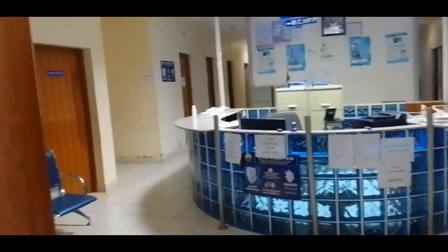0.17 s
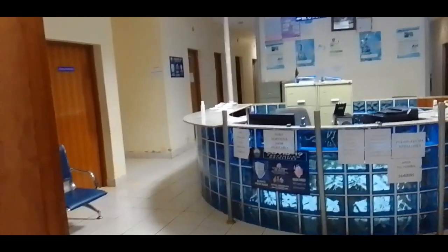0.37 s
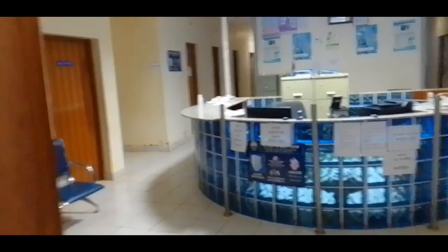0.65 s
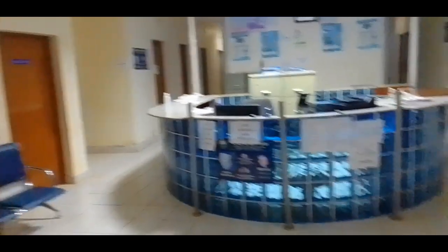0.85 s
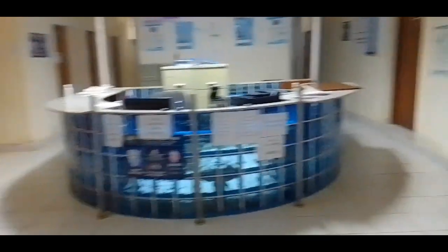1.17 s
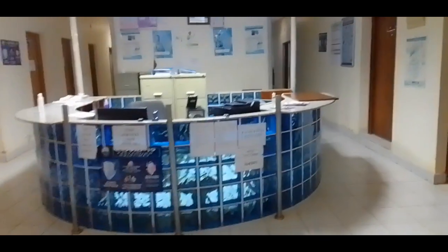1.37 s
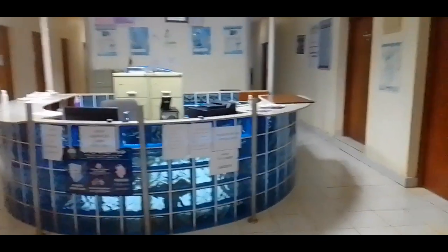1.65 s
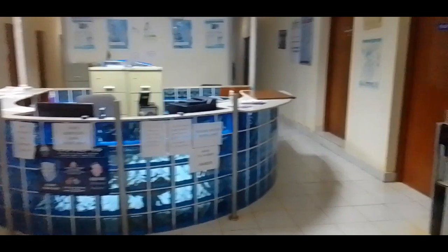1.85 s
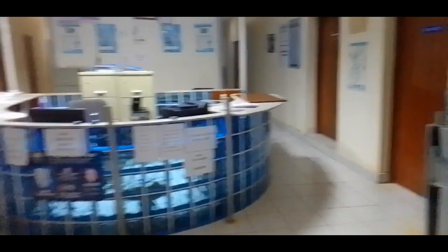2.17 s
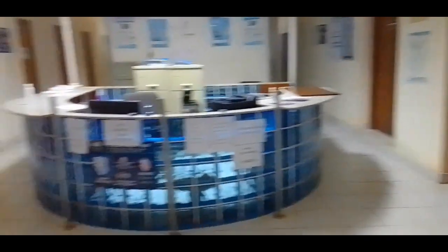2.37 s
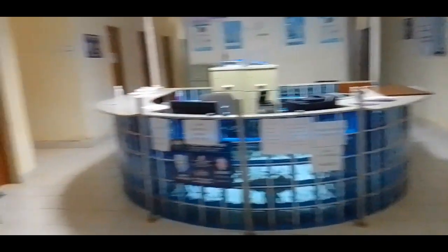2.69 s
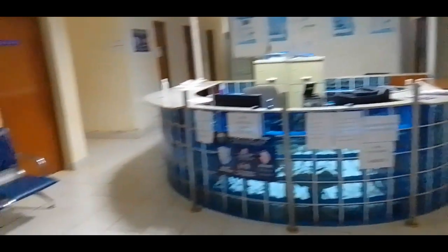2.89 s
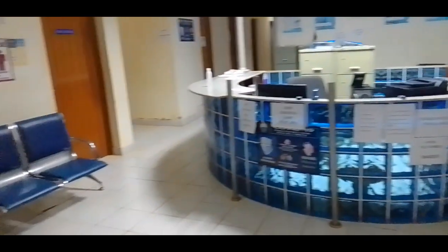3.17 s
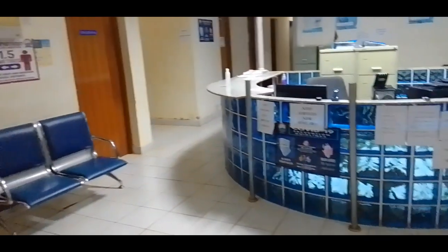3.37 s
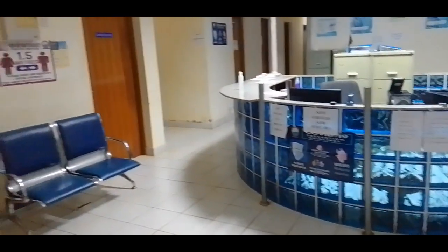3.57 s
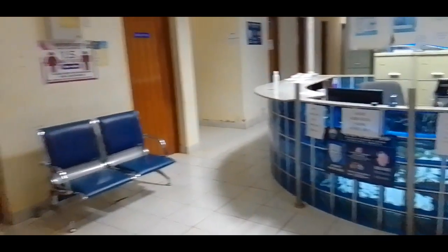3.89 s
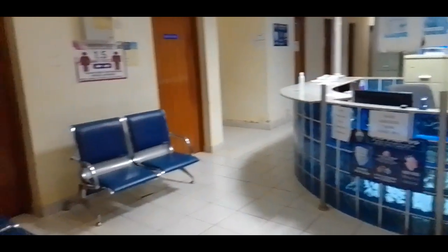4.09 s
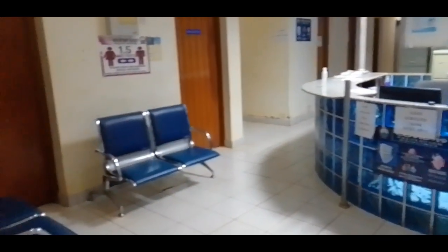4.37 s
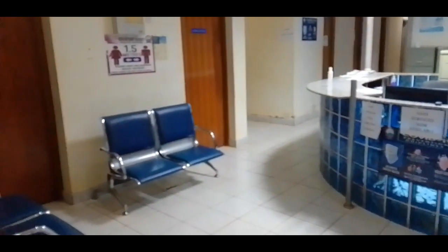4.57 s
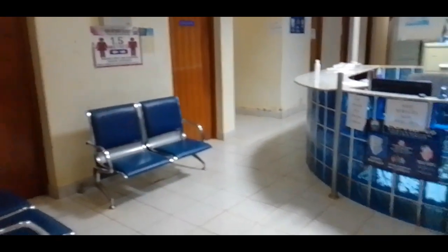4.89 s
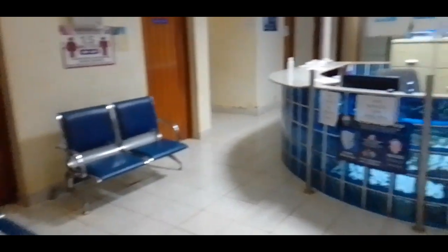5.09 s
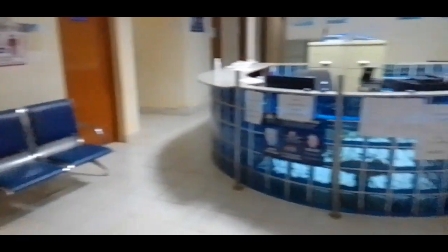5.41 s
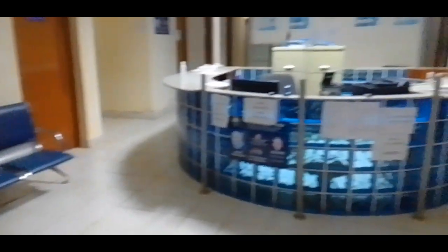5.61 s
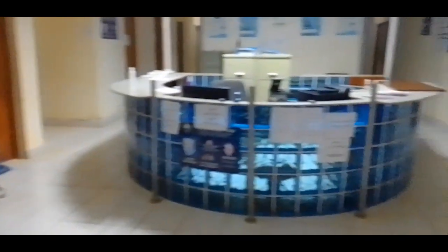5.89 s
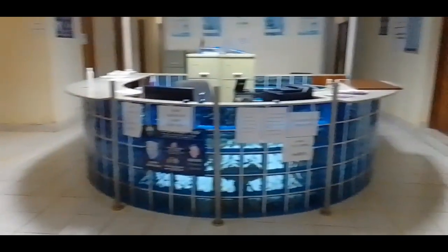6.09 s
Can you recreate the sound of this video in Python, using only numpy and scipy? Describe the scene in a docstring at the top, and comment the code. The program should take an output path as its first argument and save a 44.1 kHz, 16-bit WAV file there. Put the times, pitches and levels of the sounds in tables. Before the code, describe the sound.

In an echoing empty tiled hall, crickets trill steadily, brief husky bird whistles come and go, with close light taps over faint traffic.

```python
"""An empty tiled reception hall, open to a garden, heard through one mono microphone that cuts the deep bass.
An insect chorus of pulsed tones and a smoother trill lies near 6 kHz, with a fainter noise band near 4 kHz.
Gliding husky whistles make a bird; ringing modes make light clicks close by, and both echo in the hall.
Close in, shaped noise rustles and damped swings thud softly. Far off, multiples of a firing rate make
a small engine that climbs through a gear change, over traffic rumble, patchy midrange noise and hiss."""
import sys
import numpy as np
from scipy import signal
from scipy.fft import rfft, irfft
from scipy.io import wavfile

SR = 44100
rng = np.random.default_rng(int(sys.argv[2]) if len(sys.argv) > 2 else 0)


def dump(signal):
    """Clip the signal to [-1, 1] and save it as 16-bit WAV at the path in sys.argv[1]."""
    limited = np.clip(np.atleast_2d(signal).T, -1, 1)
    pcm = np.round(limited * 32767).astype(np.int16)
    wavfile.write(sys.argv[1], SR, pcm)


def boost(x):
    """Linear amplitude factor 10**(x/20) for a level x in decibels (scalar or array-like)."""
    u = np.asarray(x, float) / 20
    return 10 ** u


N = 275625      # samples: 6.25 s

# phrases of the pulsing singers: (start [s], length [s], level [dB], pitch [Hz])
SINGER_PHRASES = [(-.3, 0.34, -36, 5520), (0.123, 0.37, -45.5, 5616), (0.538, 0.36, -45, 5585),
                  (0.985, 0.5, -49, 5625), (1.465, .38, -48.5, 5420), (1.949, 0.34, -48.5, 5440),
                  (2.387, 0.36, -50, 5433), (2.87, 0.32, -45.5, 5550), (3.265, .36, -47.5, 5500),
                  (3.677, .31, -50.5, 5443), (4.138, 0.323, -47, 5455), (4.581, 0.34, -47.5, 5410),
                  (4.996, 0.3, -49.5, 5390), (5.493, 0.33, -46.5, 5546), (5.952, 0.31, -47, 5430)]
# smooth upper trill: (time [s], level [dB], centre [Hz])
TRILL_CURVE = [(0.0, -47.5, 6030), (0.35, -46, 5980), (0.36, -49.5, 5930), (0.71, -47.5, 5940),
               (0.92, -52.5, 5930), (1.08, -43.5, 6086), (1.27, -48, 5890), (1.36, -56, 5800),
               (1.58, -46.5, 5950), (1.79, -54.5, 5960), (2.12, -46, 6020), (2.31, -51.5, 5910),
               (2.71, -48.5, 5983), (2.99, -53.5, 5964), (3.06, -49.5, 5910), (3.31, -47.5, 6005),
               (3.48, -55, 5880), (3.79, -47, 6114), (3.95, -52.5, 5832), (4.04, -49.5, 5990),
               (4.28, -51, 5876), (4.54, -47, 6100), (4.68, -52.5, 5900), (5.05, -47.5, 6033),
               (5.21, -53, 5870), (5.36, -47.5, 6160), (5.59, -52.5, 5890), (6.08, -50, 6000),
               (6.13, -58, 5860), (6.25, -48, 5960)]
# bird notes: (start [s], length [s], first pitch [Hz], last pitch [Hz], level [dB])
BIRD_NOTES = [(0, 0.05, 3333, 2697, -43.5), (0.963, 0.043, 2650, 2870, -68),
              (0.994, 0.15, 2933, 3035, -54.5), (1.03, 0.06, 3595, 3050, -44.5),
              (1.505, 0.052, 2678, 2680, -61.5), (2.211, 0.071, 2643, 2766, -58.5),
              (2.269, 0.035, 3240, 3010, -52.5), (2.283, 0.066, 2750, 2900, -54),
              (2.46, 0.022, 2555, 2990, -50), (2.483, 0.053, 3257, 2950, -44.5),
              (2.513, 0.041, 3600, 3255, -47), (2.698, 0.11, 2710, 2820, -48),
              (2.755, .05, 3450, 2976, -44), (2.819, 0.063, 2990, 2807, -50),
              (3.039, 0.11, 3019, 3085, -49), (3.101, 0.11, 2746, 2816, -46.5),
              (3.105, 0.027, 3660, 3260, -41.5), (3.151, 0.07, 3390, 2948, -48),
              (3.485, 0.18, 2659, 2644, -60.5), (3.678, 0.22, 2630, 2457, -60.5),
              (3.837, 0.064, 1153, 1653, -80), (3.94, 0.071, 1154, 1565, -62),
              (4.024, 0.077, 2760, 2784, -49.5), (4.079, 0.054, 3470, 3133, -48.5),
              (4.107, 0.057, 2790, 2906, -47.5), (4.136, 0.026, 3275, 2946, -46),
              (4.192, 0.087, 2280, 2380, -59.5), (4.298, 0.061, 2425, 2339, -59),
              (4.402, 0.075, 2767, 2807, -46), (4.454, 0.074, 3450, 2880, -53),
              (4.845, 0.095, 2730, 2848, -64), (4.899, 0.07, 3416, 3132, -60.5),
              (4.968, 0.13, 2198, 2322, -69), (5.07, 0.088, 2814, 2887, -48),
              (5.113, 0.037, 3320, 3030, -54.5), (5.414, 0.021, 2654, 2900, -53),
              (5.444, 0.022, 2750, 2716, -54), (5.536, 0.068, 2636, 2809, -47.5),
              (5.559, 0.064, 3940, 3347, -52), (5.574, 0.068, 3347, 2810, -49),
              (6.166, 0.062, 2184, 2400, -72)]
# taps on a small hard object: (time [s], level [dB], dullness [0-1])
TAPS = [(1.3009, -45.5, 0.76), (1.5859, -53, 0.49), (1.6551, -48.5, 0.36), (1.9515, -43, 0.31),
        (1.9993, -45, 0.24), (2.1246, -54, 0.02), (2.1844, -63, 0.23), (2.9966, -71, 0.36),
        (5.5228, -42.5, 0)]
# ringing modes of that object: (frequency [Hz], relative level [dB], decay by 60 dB [s])
TAP_MODES = [(2103, -21.5, 0.011), (2750, -18, 0.022), (3600, -28, 0.096), (8320, 0, 0.019),
             (9240, -2, 0.019), (10800, -4, .012), (13700, -16, 0.0067)]
# bursts of rustle: (peak time [s], peak level [dB], rise [dB/s])
RUSTLE_BURSTS = [(1.1, -70, 300), (1.32, -55.5, 900), (1.43, -53.5, 150), (1.56, -63.5, 150),
                 (1.65, -73, 500), (1.95, -53, 2000), (2.02, -58, 300), (3.1, -68, 81), (5.46, -66, 100),
                 (5.53, -55.5, 400), (5.62, -63.5, 200)]
# colour of the rustle: (frequency [Hz], relative level [dB per Hz])
RUSTLE_COLOUR = [(6500, 2), (7300, 2), (8200, 0.5), (9200, 0), (10600, -7), (12000, -14), (14000, -23)]
# soft thuds on the microphone's case: (time [s], peak level [dB])
CASE_THUDS = [(3.758, -45), (3.902, -49.5), (4.081, -55), (4.27, -52.5), (5.868, -44.5), (5.968, -49.5)]
# faint distant chorus: (time [s], level [dB])
LOW_CHORUS_LEVEL = [(0.0, -64), (0.45, -65.5), (1.1, -63), (1.64, -66.5), (2.7, -64.5), (3.8, -67),
                    (4.1, -65), (5.8, -66), (6.25, -65)]
# far engine: (time [s], firing rate [Hz], level [dB])
ENGINE_RUN = [(0.0, 59.63, -63), (0.29, 58.7, -63), (0.95, 65, -56.5), (1.15, 69.25, -57),
              (1.37, 71.16, -60.5), (1.55, 74.95, -55.5), (2.0, 77.37, -54.5), (2.2, 76.55, -67.5),
              (2.52, 73, -62), (2.751, 61.9, -63.5), (3.1, 62.95, -59), (3.5, 63.57, -64),
              (4.0, 63.02, -63.5), (4.37, 62.74, -65.5), (4.45, 61.5, -81)]
# engine harmonics: (multiple of the firing rate, relative level [dB])
FIRING_MULTIPLES = [(2, -3.5), (3, -8), (4, 0), (5, 0.5), (6, -0.5), (7, -5), (8, -6.5), (9, -19),
                    (10, -12.5)]
# resonances of exhaust and path: (centre [Hz], width [Hz], lift [dB])
ENGINE_RESONANCES = [(137.08, 18, 8.5), (228.3, 63, 18.5), (365, 36, 7.5), (485, 190, 10)]
# midrange swells: (peak time [s], upper patch level [dB], middle patch level [dB], middle patch centre [Hz])
MIDRANGE_SWELLS = [(0.02, -63.5, -75.5, 1687), (.3, -75, -81, 1450), (1.04, -57.5, -74, 1550),
                   (1.2, -61, -68.5, 1510), (1.3, -61.5, -68, 1489), (1.43, -64.5, -67.5, 1381),
                   (1.699, -75, -74.5, 1399), (1.96, -65, -85, 1620), (2.27, -71, -79, 1600),
                   (2.4, -70, -93, 1570), (2.521, -66, -69.5, 1484), (2.77, -57.5, -67, 1508),
                   (3.159, -54, -65.5, 1645), (3.27, -74, -74, 1560), (3.451, -85, -93, 1606),
                   (3.9, -88, -74, 1492), (4.02, -68, -61, 1345), (4.121, -64, -70, 1500),
                   (4.49, -59, -75, 1680), (4.961, -61.5, -80, 1698), (5.08, -70, -87, 1593),
                   (5.17, -65.5, -72.5, 1537), (5.47, -63.5, -77, 1660), (5.61, -56.5, -71, 1672),
                   (5.85, -67.5, -75, 1615), (6.13, -64, -94, 1614), (6.22, -65, -92, 1400)]
# midrange patch near 900 Hz: (time [s], level [dB])
LOW_PATCH_LEVEL = [(0.0, -80.5), (0.29, -70.5), (0.56, -83), (1.02, -78), (1.04, -68), (1.32, -67),
                   (1.55, -69), (1.67, -61), (1.71, -66.5), (2.33, -74), (2.47, -68), (3.55, -72),
                   (3.81, -110), (4.0, -72), (5.59, -85.5), (5.66, -73.5), (5.92, -71.5), (6.25, -87)]
# traffic rumble: (time [s], level [dB])
TRAFFIC_LEVEL = [(0.0, -59), (0.31, -61), (0.42, -59), (1.67, -59), (2.16, -60), (2.77, -58), (3.5, -61),
                 (3.86, -61), (4.51, -62), (5.08, -61.5), (6.25, -64)]
# colour of the traffic: (frequency [Hz], relative level [dB per Hz])
TRAFFIC_COLOUR = [(35, -59), (60, -45), (121, -8), (231, 0), (317, -3.5), (389, -2.5), (461, -8.5),
                  (522, -5.5), (670, -17), (900, -26), (1170, -71), (1980, -120)]
# colour of the steady hiss: (frequency [Hz], relative level [dB per Hz])
HISS_COLOUR = [(500, -6), (900, 6), (3500, 2), (4250, -26), (4600, -18), (7000, 6), (10000, -14),
               (16000, -8)]
# hiss in the top treble: (time [s], level [dB])
TOP_HISS_LEVEL = [(0.0, -84), (0.23, -76), (0.75, -91), (1.09, -82), (1.5, -83), (1.74, -93), (3.2, -72.5),
                  (3.67, -86), (4.11, -77), (4.28, -74.5), (4.94, -70.5), (5.22, -74.5), (5.85, -75),
                  (6.25, -77.5)]
# colour of the top hiss: (frequency [Hz], relative level [dB per Hz])
TOP_HISS_COLOUR = [(8500, -39), (10300, -1.5), (12000, -2.5), (13000, -7.5), (14500, -3.5), (16000, -13)]


def high_chorus():
    """Near singers stroke their wings some 45 times a second, each stroke a raspy falling tone, under a trill."""
    return pulsing_singers() + smooth_trill()


def stroke_phase(rate_spread):
    """Wing-stroke cycles since the start, at a rate that wanders around 44.5 per second."""
    return np.cumsum(44.5 * (1 + rate_spread)) / SR


def pulsing_singers(count=3):
    """Each stroke sounds a falling tone for part of its cycle; uneven tooth strikes roughen it."""
    stroke_share, sweep_hz, near_singer_db, blur_db = 0.7, 708, 4.5, -1.0
    phrase_hz = in_time([(s + length / 2, hz) for s, length, db, hz in SINGER_PHRASES])[0]
    near = 0
    for k in range(count):
        stroke = (rng.random() + stroke_phase(0.013 * rng.normal() + 0.035 * drift(3.0))) % 1
        along = np.clip(stroke / stroke_share, 0, 1)
        pitch = phrase_hz + 60 * drift(1.5) + sweep_hz * (0.5 - along)
        tone = rasp(width_hz=120, share=0.55) * turning(pitch)
        singer_db = near_singer_db * (k == 0) + 1.8 * drift(0.92)
        near = near + rms_one(np.sin(np.pi * along) * tone.real) * boost(singer_db)
    blur = rms_one(band(rng.standard_normal(N), 5050, 6200))      # far singers and echoes fill the gaps
    pulsing = band(rms_one(near) + boost(blur_db) * blur, 5150, 6150)
    pulsing = rms_one(band(pulsing, 4850, 6700, order=5))
    overtone = boost(-41) * rms_one(band(pulsing ** 2, 8300, 14000))      # the wings also ring an octave up
    return boost(phrase_level_db()) * (pulsing + overtone)


def phrase_level_db():
    """Level in dB of the pulsing singers: each phrase swells, holds and breaks off."""
    rise_s, fall_s, between_db = 0.067, 0.073, -52
    t, level_db = np.arange(N) / SR, np.full(N, float(between_db))
    for s, length, db, hz in SINGER_PHRASES:
        singing = np.clip(np.minimum((t - s) / rise_s, (s + length - t) / fall_s), 0, 1)
        level_db = np.maximum(level_db, between_db + singing * (db - between_db))
    return level_db


def smooth_trill():
    """A wide, noisy tone throbs gently at about the stroke rate."""
    level_db, centre_hz = in_time(TRILL_CURVE)
    throb = 1 + 0.13 * np.sin(2 * np.pi * stroke_phase(0.07 * drift(3.0)))
    trill = throb * np.real(rasp(width_hz=580, share=0.96) * turning(centre_hz))
    trill = band(band(trill, 5400, 6400), 4900, 7250, order=5)
    return boost(level_db) * rms_one(trill)


def bird():
    """Short gliding, husky whistles with a faint tone an octave below."""
    scoop_hz, scoop_s, attack_s, undertone_db = 364, 0.009, 0.007, -21
    out, husk = np.zeros(N), rasp(width_hz=95, share=0.44)
    for s, length, first_hz, last_hz, level_db in BIRD_NOTES:
        start = round(s * SR)
        along = np.linspace(0, 1, round(length * SR))
        pitch = first_hz + (last_hz - first_hz) * along
        if last_hz > first_hz:      # rising notes start from below
            pitch = pitch - scoop_hz * np.exp(-along * length / scoop_s)
        octave_below = turning(pitch / 2)
        attack = np.minimum(along * length / attack_s, 1)
        shape = attack * np.sqrt(np.abs(np.cos(np.pi / 2 * along)))
        tone = (octave_below ** 2 + boost(undertone_db) * octave_below) * husk[start:start + len(along)]
        out[start:start + len(along)] += boost(level_db) * shape * tone.real
    return out


def clicks():
    """A small hard object is tapped close by: every mode rings briefly, dull taps lose their top."""
    times, tap_db, dull = np.transpose(TAPS)
    at = np.round(times * SR).astype(int)
    scatter_db = rng.normal(0, 0.71, (len(at), len(TAP_MODES)))
    out = np.zeros(N)
    for k, (hz, mode_db, t60) in enumerate(TAP_MODES):
        tilt_db = -19.1 * dull * np.log2(hz / 8000)
        blows = np.full(N, 1e-18)
        blows[at] = boost(tap_db + mode_db - 1 + scatter_db[:, k] + tilt_db)
        r, w = boost(-60 / (t60 * SR)), 2 * np.pi * hz / SR      # decay and turn per sample
        out += signal.lfilter([0, np.sin(w)], [1, -2 * r * np.cos(w), r * r], blows)
    crack = np.zeros(N)      # the contact itself: one sharp broad tick
    crack[at] = boost(tap_db + 12.02)
    return out + band(crack, 1900, 13000)


def rustle(level_db):
    """Treble noise in irregular bursts, close to the microphone."""
    return boost(level_db) * coloured(RUSTLE_COLOUR, patchy_db=2.5)


def thuds():
    """Fingers shift on the microphone's case: one soft, damped low swing each."""
    swing_hz, damping_s, lag_s = 240, 0.0022, 0.005
    out, t = np.zeros(N), np.arange(2000) / SR
    swing = np.sin(2 * np.pi * swing_hz * t) * t * np.exp(-t / damping_s)
    for s, peak_db in CASE_THUDS:
        start = round((s + lag_s) * SR)      # the case takes a moment to swing
        out[start:start + len(t)] += boost(peak_db) * swing / swing.max()
    return out


def hall(x):
    """Dense echoes off tile and plaster: dulled dying noise, plus full-band noise dying twice as fast."""
    t60_s, wall_cut_hz, first_echoes_s = 0.67, 3700, 0.008
    t = np.arange(SR) / SR
    low_pass = signal.butter(1, wall_cut_hz, fs=SR, output="sos")
    dull = signal.sosfilt(low_pass, rng.standard_normal(SR))
    tail = dull * boost(-60 * t / t60_s) + rng.standard_normal(SR) * boost(-120 * t / t60_s)
    tail = tail * np.minimum(t / first_echoes_s, 1)      # the first echoes need time to arrive
    return signal.fftconvolve(x, tail / np.sqrt(np.sum(tail ** 2)))[:N]


def low_chorus():
    """Distant crickets merge into a softly throbbing band of noise."""
    centre_hz, width_hz = 3826, 423
    throb = 1 + 0.11 * np.sin(2 * np.pi * np.cumsum(38 * (1 + 0.16 * drift(1.5))) / SR)
    noise = band(rng.standard_normal(N), centre_hz - width_hz / 2, centre_hz + width_hz / 2, order=4)
    return boost(in_time(LOW_CHORUS_LEVEL)[0]) * rms_one(throb * noise)


def engine():
    """Multiples of the firing rate swell as they pass through the resonances on their way."""
    last_s, last_hz, last_db = ENGINE_RUN[-1]
    firing_hz, level_db = in_time(ENGINE_RUN + [(last_s + 0.23, last_hz, -100)])      # fades out
    phase = 2 * np.pi * np.cumsum(firing_hz * (1 + 0.0071 * drift(5.95))) / SR
    tones = 0
    for k, db in FIRING_MULTIPLES:
        lift_db = 0
        for centre, width, top_db in ENGINE_RESONANCES:
            lift_db = lift_db + top_db / (1 + (2 * (k * firing_hz - centre) / width) ** 2)
        tone = np.sin(k * phase + 2 * np.pi * rng.random())
        tones = tones + boost(db + lift_db + 3.0 * drift(3.2)) * tone
    return boost(level_db) * rms_one(tones)


def midrange_wash():
    """Midrange noise swells and sinks in three patches; the middle patch also wanders in pitch."""
    s, upper_peaks_db, middle_peaks_db, centres_hz = np.transpose(MIDRANGE_SWELLS)
    upper_db = swells(s, upper_peaks_db, rise_db_per_s=443, fall_db_per_s=60.5, floor_db=-88)
    middle_db = swells(s, middle_peaks_db, rise_db_per_s=443, fall_db_per_s=66, floor_db=-95)
    middle_hz = np.interp(np.arange(N) / SR, s, centres_hz)
    low = rms_one(band(rng.standard_normal(N), 690, 1060, order=5))
    middle = rms_one(np.real(rasp(width_hz=170, share=1) * turning(middle_hz)))
    upper = rms_one(band(rng.standard_normal(N), 2050, 3750, order=5))
    patches = (in_time(LOW_PATCH_LEVEL)[0], low), (middle_db, middle), (upper_db, upper)
    return sum(boost(db + 1.53 * drift(19.0)) * x for db, x in patches)


def traffic():
    """Far traffic is low, slowly swelling coloured noise."""
    return boost(in_time(TRAFFIC_LEVEL)[0]) * coloured(TRAFFIC_COLOUR, patchy_db=2.0)


def hiss():
    """A faint bed of coloured noise whose bands flicker."""
    return boost(-80.5) * coloured(HISS_COLOUR, patchy_db=3.0)


def top_hiss(rustle_db):
    """Top treble noise follows its own level curve, and the rustle reaches into it."""
    level = boost(in_time(TOP_HISS_LEVEL)[0]) + boost(rustle_db - 29)
    return level * coloured(TOP_HISS_COLOUR, patchy_db=3.5)


def in_time(rows):
    """Columns of a curve table, one value per sample."""
    s, *columns = np.transpose(rows)
    return [np.interp(np.arange(N) / SR, s, c) for c in columns]


def rms_one(x):
    """Scale to rms 1."""
    return x / np.sqrt(np.mean(np.abs(x) ** 2) + 1e-20)


def band(x, low_hz, high_hz, order=2):
    """Butterworth band-pass."""
    return signal.sosfilt(signal.butter(order, [low_hz, high_hz], "band", fs=SR, output="sos"), x)


def turning(hz):
    """Complex tone that follows a pitch curve."""
    return np.exp(2j * np.pi * np.cumsum(hz) / SR)


def drift(rate_hz):
    """Slow random wander of rms 1: noise twice through a one-pole low-pass, on every 40th sample."""
    r = np.exp(-2 * np.pi * rate_hz * 40 / SR)
    noise = rng.standard_normal(N // 40 + 2002)
    slow = signal.lfilter([1], [1, -2 * r, r * r], noise)[2000:]      # drop the run-in
    return np.interp(np.arange(N) / 40, np.arange(len(slow)), rms_one(slow))


def rasp(width_hz, share):
    """Complex gain that widens a tone: a steady part plus narrow noise."""
    r = np.exp(-2 * np.pi * width_hz / SR)
    noise = rng.standard_normal(N) + 1j * rng.standard_normal(N)
    narrow = signal.lfilter([1], [1, -2 * r, r * r], noise)
    return 1 - share + share * rms_one(narrow)


def coloured(spectrum, patchy_db):
    """Noise of rms 1 with the given spectrum, in third-octave bands that each flicker a little."""
    hz, db = np.transpose(spectrum)
    grid = np.maximum(np.arange(N // 2 + 1) * SR / N, 1)
    gain = boost(np.interp(np.log(grid), np.log(hz), db, -120, -120))
    shaped = rfft(rng.standard_normal(N)) * gain
    third = np.floor(3 * np.log2(grid))
    used = np.unique(third[(grid > hz[0]) & (grid < hz[-1])])
    return rms_one(sum(irfft(shaped * (third == k), N) * boost(patchy_db * drift(5.1)) for k in used))


def swells(times, peaks_db, rise_db_per_s, fall_db_per_s, floor_db):
    """Level in dB of overlapping swells that climb to their peak and die away over a floor."""
    times, peaks_db, rise = (np.reshape(v, (-1, 1)) for v in (times, peaks_db, rise_db_per_s))
    late = np.arange(0, N, 32) / SR - times      # seconds after each peak, on every 32nd sample
    each_db = peaks_db - np.where(late < 0, -late * rise, late * fall_db_per_s)
    total_db = 10 * np.log10(np.sum(boost(2 * each_db), axis=0) + boost(2 * floor_db))
    return np.interp(np.arange(N) / 32, np.arange(len(total_db)), total_db)


def scene():
    """All sources in mono on two equal channels; bird and clicks also sound through the hall."""
    rustle_db = swells(*np.transpose(RUSTLE_BURSTS), fall_db_per_s=110, floor_db=-76.5)
    sharp = bird() + clicks()
    near = high_chorus() + sharp + boost(-2) * hall(sharp) + rustle(rustle_db) + thuds()
    far = low_chorus() + engine() + midrange_wash() + traffic() + hiss() + top_hiss(rustle_db)
    mono = near + far
    return np.array([mono, mono])


def roll_off(x):
    """The treble ends steeply here."""
    return signal.sosfilt(signal.butter(12, 15640, fs=SR, output="sos"), x)


def record(dry):
    """The microphone cuts the bass below 90 Hz and adds a trace of its own low noise."""
    cut = signal.sosfilt(signal.butter(4, 90, "high", fs=SR, output="sos"), dry)
    low_noise = boost(-94.5) * rms_one(band(rng.standard_normal(N), 24, 90))
    return roll_off(cut + low_noise)


dry = scene()
out = record(dry)
dump(out)
```